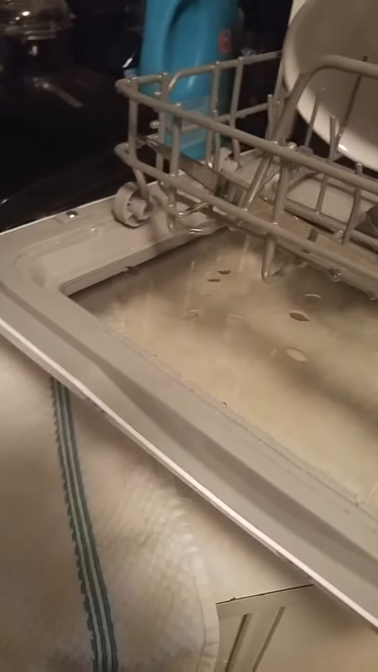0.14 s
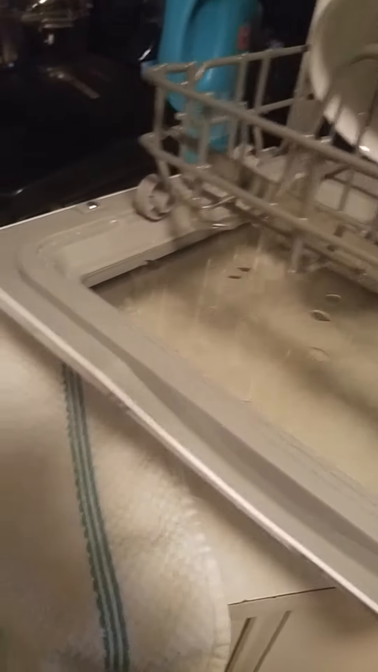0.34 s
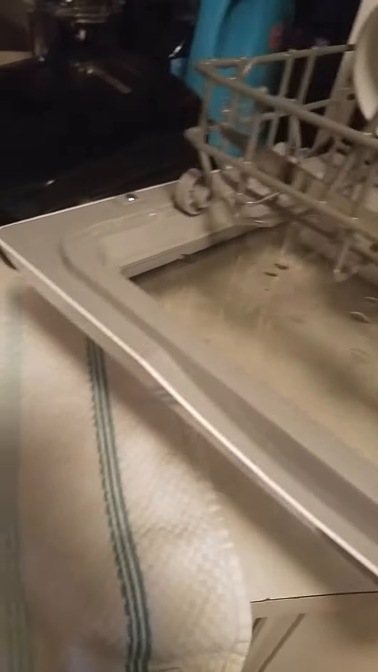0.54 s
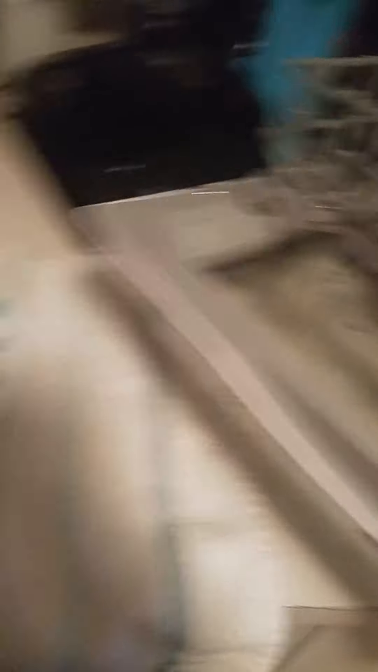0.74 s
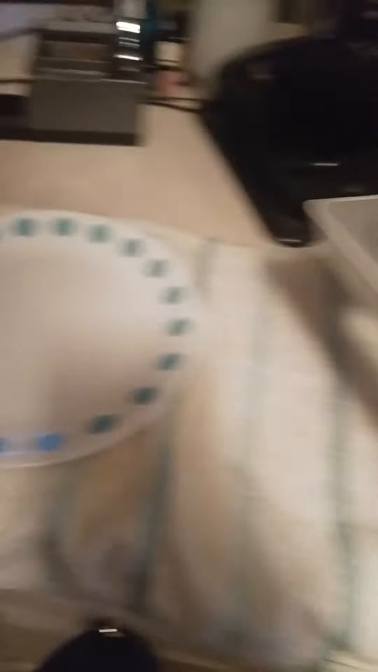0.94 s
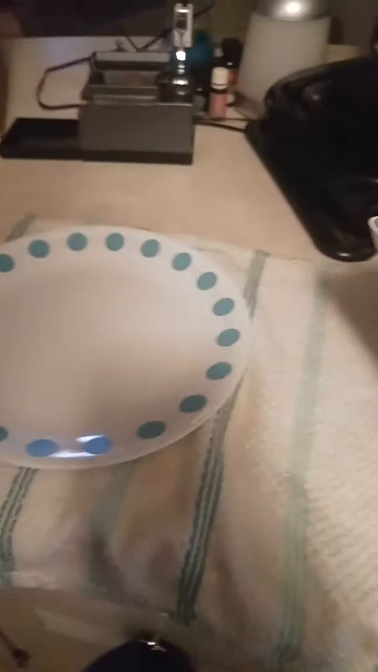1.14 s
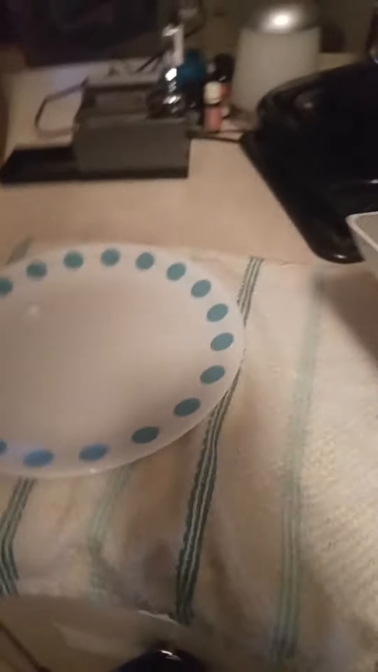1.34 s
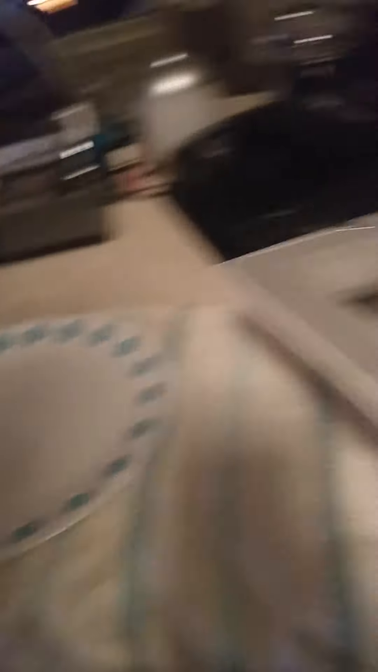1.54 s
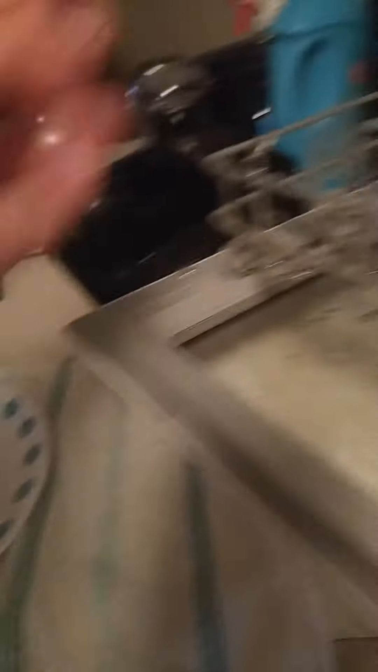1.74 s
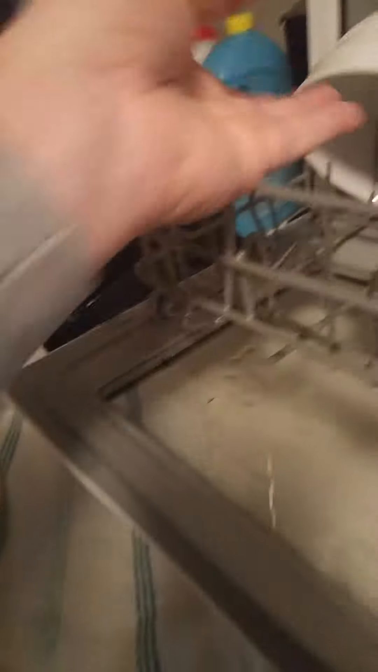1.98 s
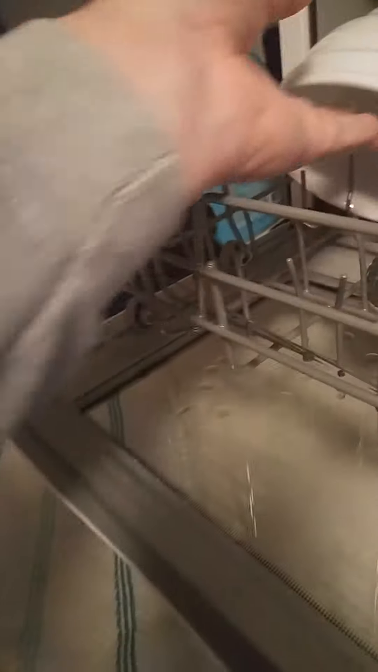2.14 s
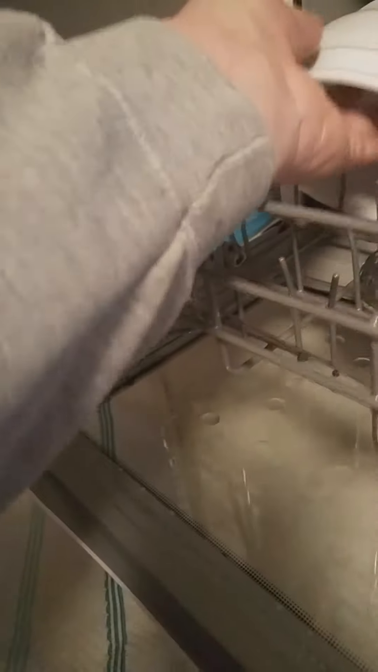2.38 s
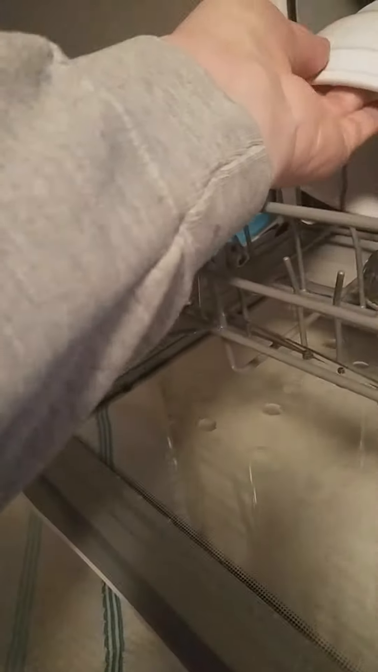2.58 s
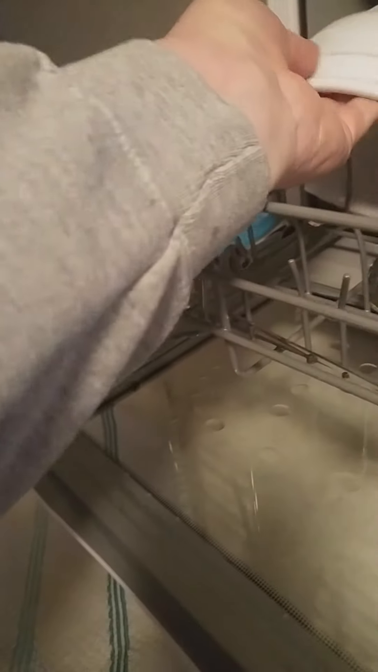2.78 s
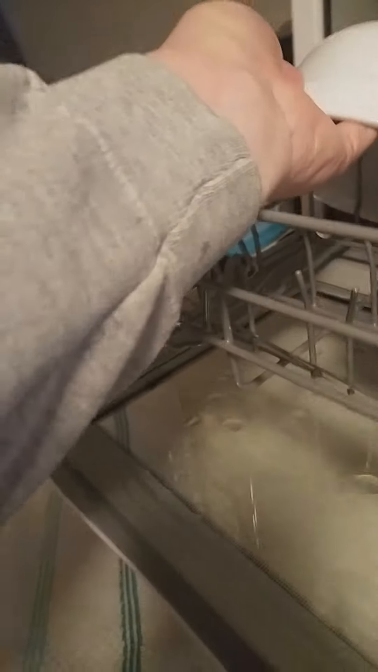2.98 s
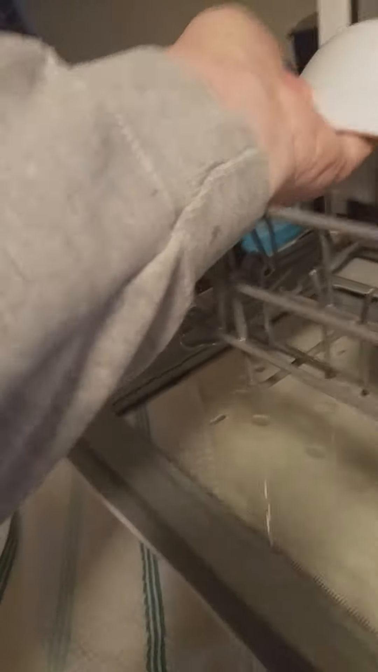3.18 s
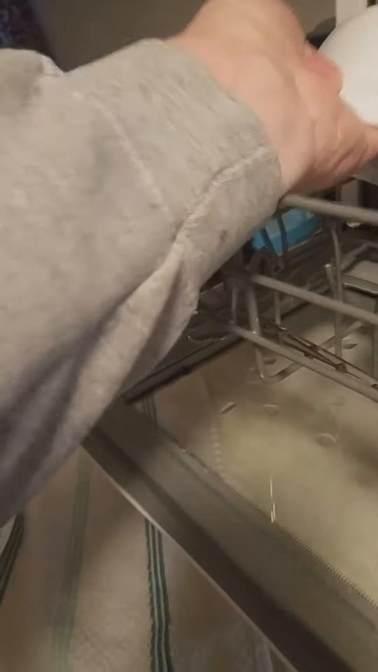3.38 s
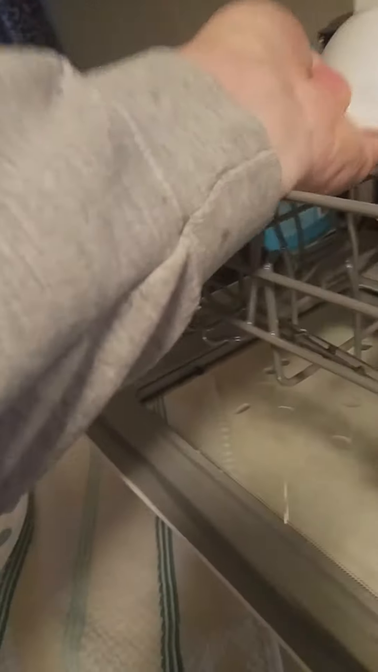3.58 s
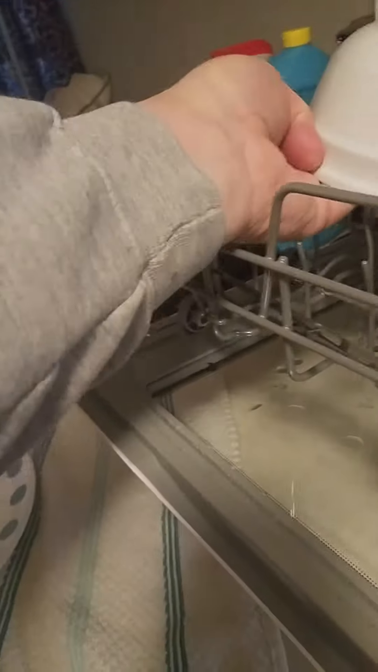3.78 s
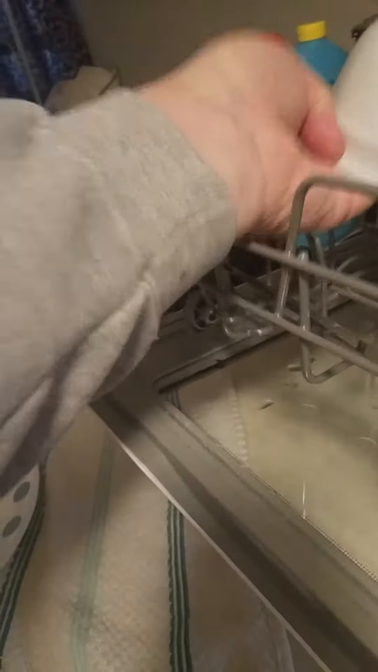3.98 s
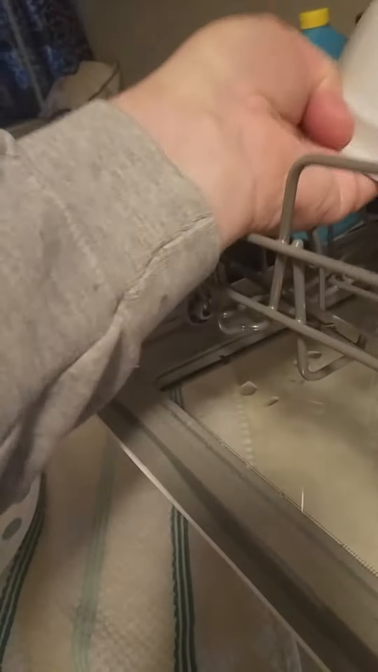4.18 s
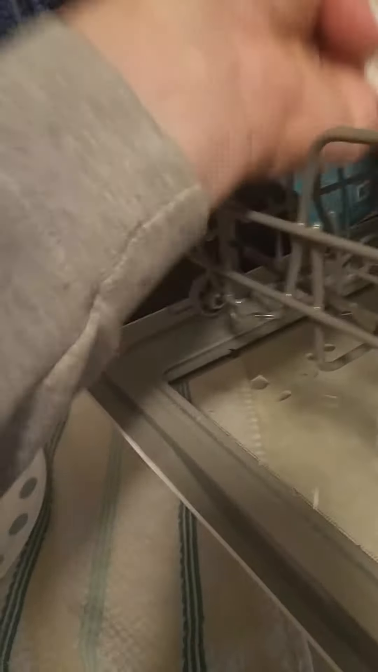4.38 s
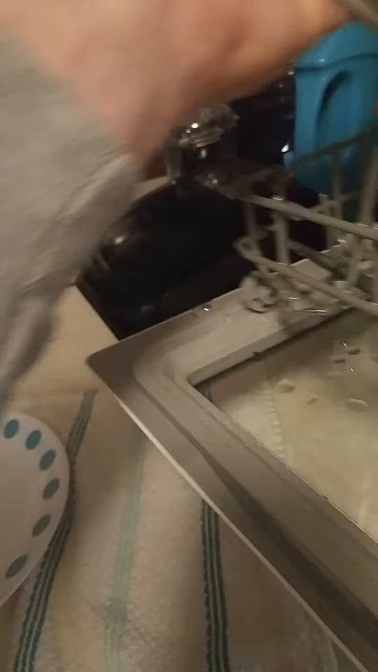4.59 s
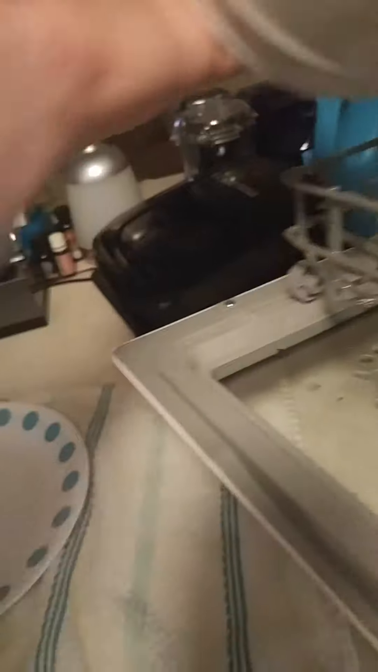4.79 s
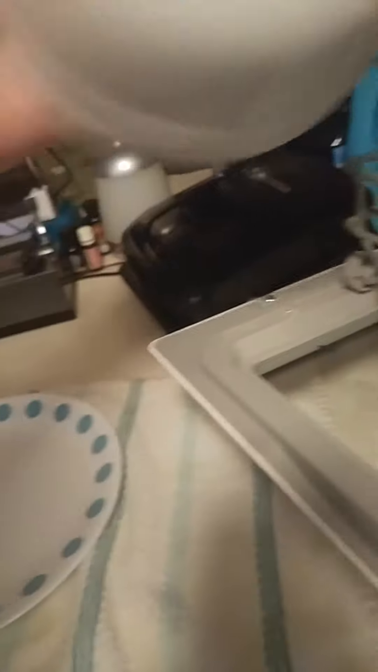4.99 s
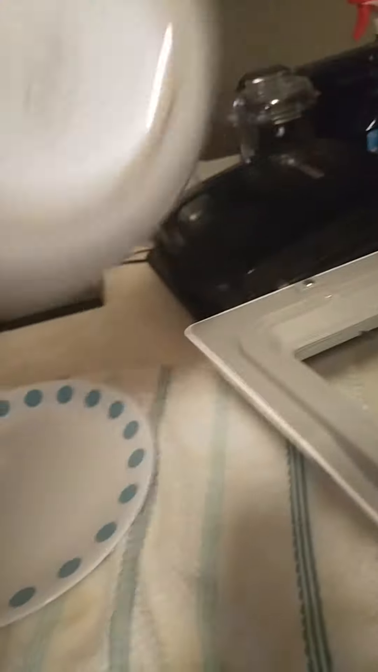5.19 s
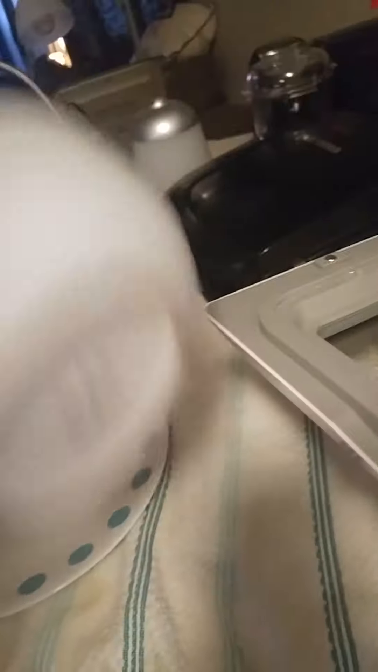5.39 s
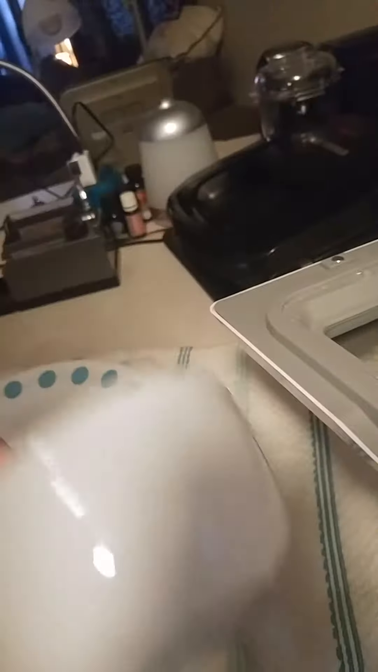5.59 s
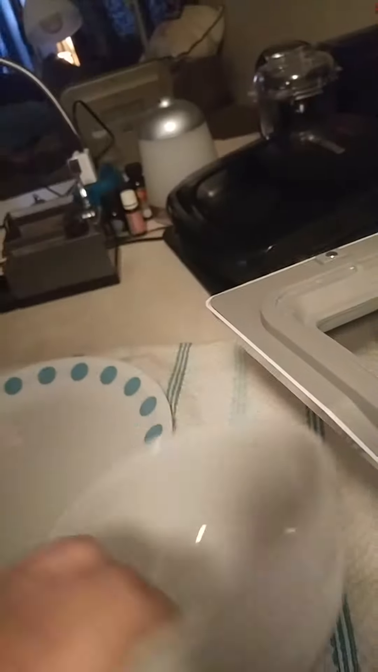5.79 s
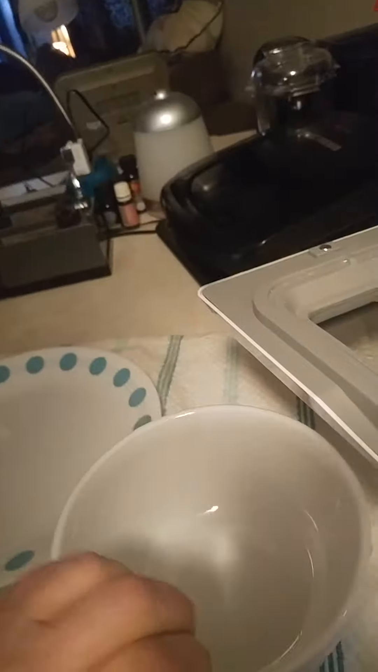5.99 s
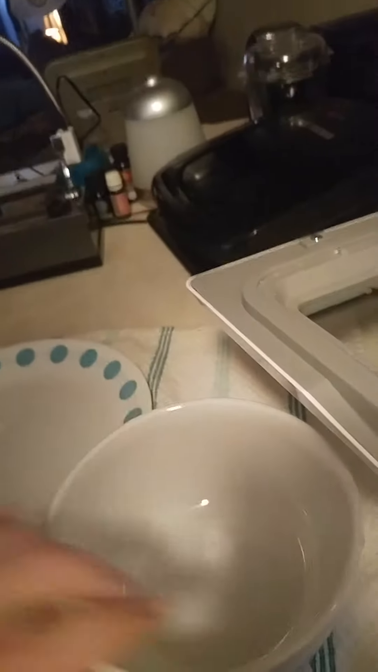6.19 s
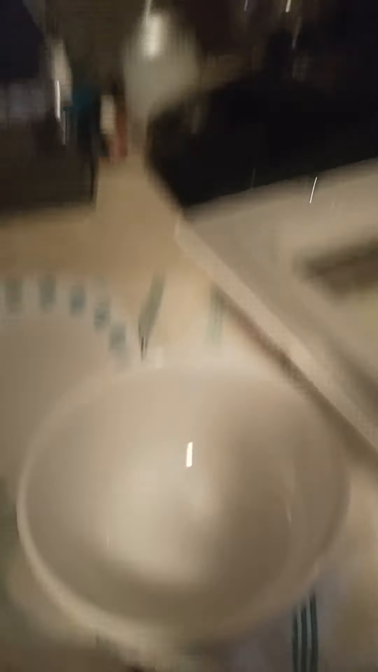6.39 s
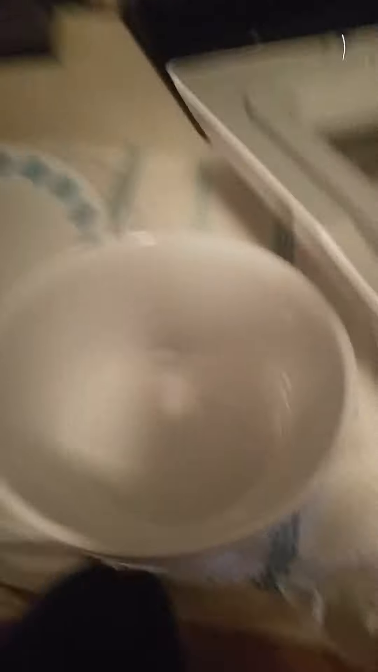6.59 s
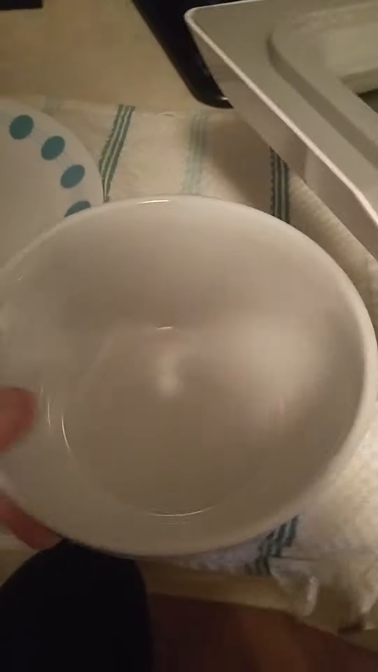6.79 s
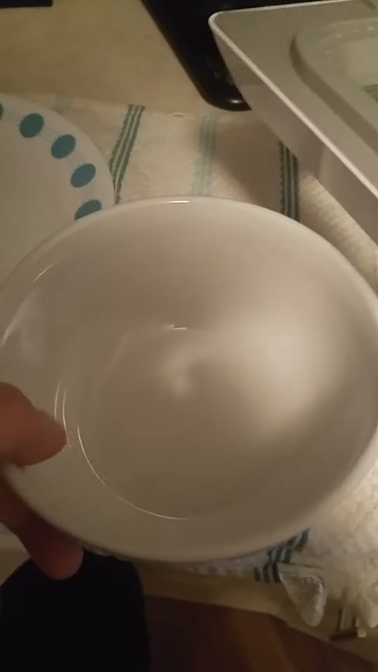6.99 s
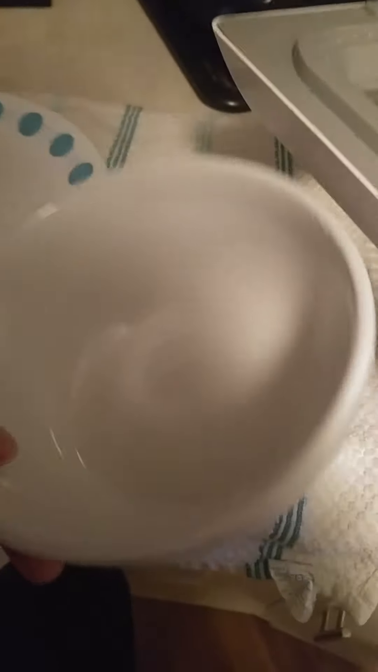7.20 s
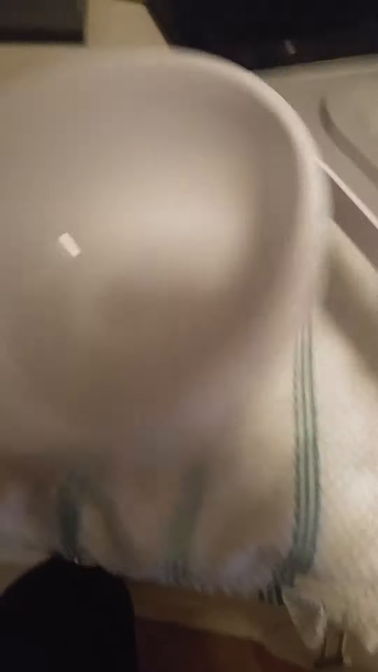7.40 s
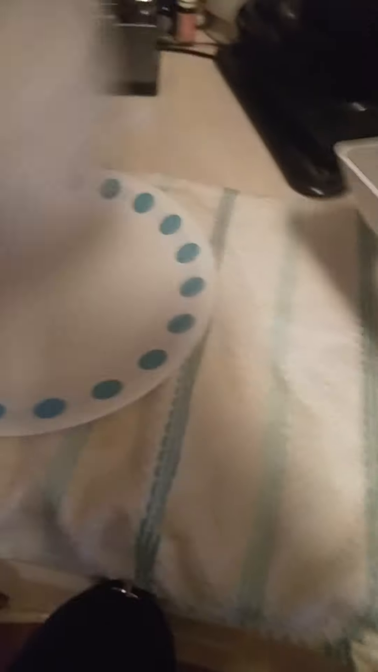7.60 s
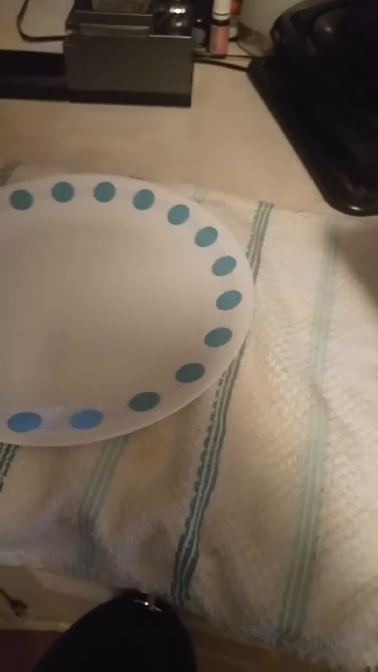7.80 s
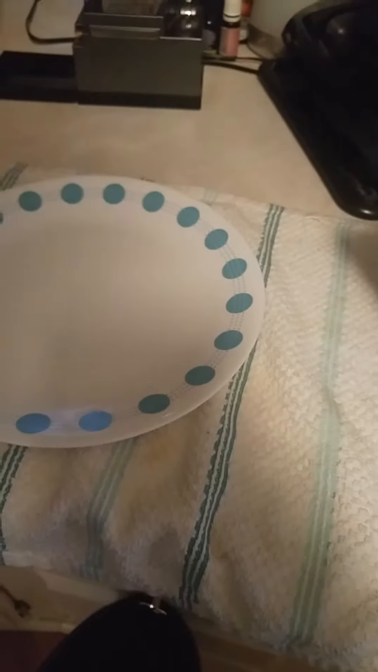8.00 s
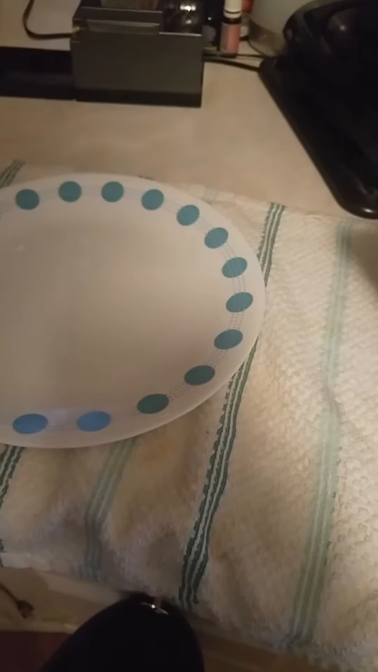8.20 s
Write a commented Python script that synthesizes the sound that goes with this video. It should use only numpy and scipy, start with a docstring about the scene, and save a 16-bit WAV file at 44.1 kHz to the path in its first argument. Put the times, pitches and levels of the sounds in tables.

```python
"""A humming kitchen, heard close to the dish rack on a hand-held phone with two microphone ports.
A china bowl is worked out of the wire rack: it knocks, chatters and scrapes on the tines, setting
basket, wires and china ringing, drags free, and is set on a plate that rings on.
Before that come short bright swishes; around it are dull thuds, rustling cloth, a slide on a towel
and the rumble of the hand that holds the microphone."""
import sys
import numpy as np
from scipy import signal
from scipy.fft import rfft, irfft, next_fast_len
from scipy.io import wavfile
from scipy.ndimage import map_coordinates

SR = 44100
rng = np.random.default_rng(int(sys.argv[2]) if len(sys.argv) > 2 else 0)


def unload_wav(signal):
    """Save mono or channel-first audio to the path in sys.argv[1] as 16-bit WAV at rate SR, clipped to [-1, 1]."""
    wavfile.write(
        sys.argv[1],
        SR,
        np.round(np.clip(np.atleast_2d(signal).T, -1, 1) * 32767).astype(np.int16),
    )


N = 363384


def amp(db):
    return 10 ** (np.asarray(db) / 20)


def unit(x):
    return x / np.sqrt(np.mean(x ** 2) + 1e-20)


def sides(pan_db):
    """Left and right gains, pan_db apart."""
    return amp([[pan_db / 2], [-pan_db / 2]])


def add(out, s, x):
    """Mixes x into out from second s on."""
    part = out[..., round(s * SR):][..., :x.shape[-1]]
    part += x[..., :part.shape[-1]]


def along(points, hz):
    """Reads (frequency [Hz], value) points on a log axis."""
    f, values = np.transpose(points)
    return np.interp(np.log(hz + 1), np.log(f + 1), values)


def curves(rows):
    """One level per sample for each column after the time; silent outside the rows."""
    s, *columns = np.transpose(rows)
    return [np.interp(np.arange(N) / SR, s, db, -120, -120) for db in columns]


def wobble(rate):
    """A smooth random curve, rate knots a second."""
    return map_coordinates(rng.standard_normal(int(N * rate / SR) + 4), [np.arange(N) * rate / SR])


def swells(events):
    """Envelope of (time [s], level [dB], rise [s], hold [s], fall [s]); rise and fall span 30 dB."""
    t, shapes = np.arange(N) / SR, []
    for s, db, rise, held, fall in events:
        corners = np.cumsum([s - rise, rise, held, fall])
        shapes.append(np.interp(t, corners, [db - 30, db, db, db - 30], -120, -120))
    return amp(np.max(shapes, 0))


def bursts(times, db, t60, rise, pan_db):
    """Stereo envelope of dying bursts; each setting is one value for all or one per burst."""
    out, t = np.zeros((2, N)), np.arange(SR // 2) / SR
    for s, level, decay, attack, pan in np.broadcast(times, db, t60, rise, pan_db):
        add(out, s, sides(pan) * amp(level - 60 * t / decay) * (1 - np.exp(-t / attack)))
    return out


def filtered(x, response):
    """x times a complex response of frequency."""
    size = next_fast_len(N + SR // 2)
    return irfft(rfft(x, size) * response(np.fft.rfftfreq(size, 1 / SR)), size)[..., :N]


def resonances(bands, f):
    """Response at f of (centre [Hz], width [Hz], level [dB]) resonances of alternating sign."""
    return sum((-1) ** k * amp(db) * 1j * f * width / (hz * hz - f * f + 1j * f * width)
               for k, (hz, width, db) in enumerate(bands))


# How alike noise is at the two microphone ports: (frequency [Hz], correlation [0-1])
PORT_LIKENESS = [(60, 0.8), (300, .92), (640, 0.061), (15000, 0.14)]
def rush(spectrum):
    """Stereo noise of rms 1, alike at both ports in the bass only."""
    def response(hz):
        spread = np.arccos(np.clip(along(PORT_LIKENESS, hz), -1, 1)) / 2
        return amp(along(spectrum, hz)) * [np.cos(spread), np.sin(spread)]
    mid, side = filtered(rng.standard_normal((2, N)), response)
    return unit(np.array([mid + side, mid - side]))


LEAD_S = 0.0003065  # the left port hears the dishes first
def ring(modes, scatter_db, rise_s, length=SR // 3, detune=.003):
    """One blow: each mode at a new strength, slightly detuned; treble reaches the ports out of step."""
    hz, db, t60 = np.transpose(modes)[:, :, None]
    t = np.arange(length) / SR
    skew, strength, mistune = rng.standard_normal((len(modes), 3)).T[:, :, None]
    port_phase = np.pi * hz * LEAD_S + np.clip(hz / 3000, 0, 1) * skew
    decay = amp(db + scatter_db * strength - 60 * t / t60)
    swing = decay * np.exp(2j * np.pi * hz * (1 + detune * mistune) * t)
    pair = [np.imag(np.exp(1j * side * port_phase[:, 0]) @ swing) for side in (1, -1)]
    return np.array(pair) * (1 - np.exp(-t / rise_s)) / np.linalg.norm(amp(db))


def rubbed(modes, drive):
    """Uneven stick and slip drives the modes; a soft contact feeds little above the top one."""
    grit = amp(7.5 * wobble(150)) * (rng.standard_normal(N) + 0.92 * rng.standard_normal((2, N)))
    top_hz = 1.2 * max(modes)[0]
    bands = [(hz, np.log(1000) / np.pi / t60, db + 10 * np.log10(t60)) for hz, db, t60 in modes]
    def response(f):
        port_delay = np.exp(1j * np.pi * LEAD_S * np.outer([1, -1], f))
        return resonances(bands, f) / (1 + 1j * f / top_hz) ** 2 * port_delay
    steady, driven = filtered(np.array([grit, grit * drive]), response)
    return driven / steady.std()


# Mains hum in the room: (frequency [Hz], relative level [dB])
HUM = [(60, -68), (120, -72), (240, -68.5), (360, -68), (720, -76.5)]
# Swells of a faint low tone: (time [s], relative level [dB], pitch [Hz])
LOW_TONE = [(1.346, -51, 260.5), (1.554, -62.5, 256.4), (1.7, -63, 263), (1.88, -57, 258.2),
            (2.0, -52.5, 260.7), (2.07, -54, 207)]
# Course of a late drone: (time [s], level [dB])
DRONE = [(6.65, -73.5), (6.8, -63.5), (7.05, -61), (7.25, -61), (7.7, -61), (7.9, -60.5), (8.03, -54),
         (8.1, -61.5), (8.24, -48.5)]
# Its bands: (centre [Hz], width of each of two filter passes [Hz], relative level [dB])
DRONE_BANDS = [(917, 35, 0), (958, 35, -2), (1140, 40, -7), (1550, 80, -6), (2050, 70, -15),
               (1400, 1500, -8)]
def kitchen_tones():
    """Mains hum, a faint low tone, and a drone of fuzzy bands that flicker one by one."""
    def band(hz, width):
        noise = rng.standard_normal((2, N))
        return unit(filtered(noise, lambda f: resonances([(hz, width, 0)], f) ** 2))
    t = np.arange(N) / SR
    hum = sum(amp(db - 4 + 2.5 * wobble(7.1)) * np.sin(2 * np.pi * hz * t + 0.48 * wobble(2.4))
              for hz, db in HUM)
    tone = sum(swells([(s, db + 3, .27, .02, .11)]) * np.sin(2 * np.pi * hz * t)
               for s, db, hz in LOW_TONE)
    drone = sum(amp(db + 1.3 * wobble(3)) * band(hz, width) for hz, width, db in DRONE_BANDS)
    return hum + tone + amp(curves(DRONE)[0]) * drone


# Steady noise at the microphone: (time [s], rumble level [dB], room level [dB])
HANDLING = [(0.0, -74, -64.5), (0.53, -72.5, -68), (1.17, -67.5, -58), (1.67, -76.5, -65), (2.09, -62, -57),
            (2.5, -79, -70), (2.78, -62, -68), (2.98, -54, -55.5), (3.79, -50, -46.5), (4.11, -45, -52),
            (4.41, -59, -36.5), (4.63, -64.5, -65.5), (5.69, -66.5, -56), (6.03, -66, -59.5),
            (7.02, -73.5, -64), (7.57, -68.5, -53.5), (7.8, -79, -59), (8.24, -72, -60)]
# Lurches of rack and hand: (time [s], rumble level [dB], room level [dB])
LURCHES = [(.23, -76, -68), (.44, -72, -68), (.69, -73, -67), (.97, -58, -73), (1.35, -73, -63.5),
           (1.9, -73, -64), (2.182, -51, -50.5), (2.32, -56, -59), (2.52, -49.5, -57), (2.68, -64, -55.5),
           (2.96, -36.5, -38), (3.08, -66, -55), (3.3, -43, -31.5), (3.492, -40.5, -36.5), (3.58, -42, -49),
           (3.818, -33, -24.5), (4.01, -63, -82), (4.2, -41, -70), (4.379, -36.5, -35),
           (4.559, -42.5, -40.5), (4.859, -56.5, -57), (5.249, -45.5, -47.5), (5.62, -69, -71),
           (5.97, -39.5, -53), (6.56, -67, -62), (7.2, -71, -64), (7.41, -62, -55), (7.499, -64, -38),
           (7.78, -75, -58.5), (8.17, -53, -51)]
# Rumble of the hand on the phone: (frequency [Hz], relative density [dB])
RUMBLE = [(12, -48.5), (20, -16), (65, 4), (86, 5), (130, -11), (200, 2), (260, -17.5), (440, -120)]
# Room noise around it: (frequency [Hz], relative density [dB])
ROOM = [(59, -27), (100, -7), (199, -13.5), (263, 0.5), (304, -10), (353, 3), (409, -2.5), (481, -9.5),
        (549, -19), (576, -2), (668, -5.5), (786, -5.5), (911, -10.5), (2070, -27), (5000, -33),
        (6500, -53.5), (11000, -120)]
def handling_and_room():
    """Lumpy handling rumble and room noise; every lurch lifts both."""
    rumble_db, room_db = curves(HANDLING)
    lurch_s = (.066, .015, .096)  # rise, hold, fall
    rumble_lift = swells([(s, db, *lurch_s) for s, db, _ in LURCHES])
    room_lift = swells([(s, db, *lurch_s) for s, _, db in LURCHES])
    rumble_level = amp(rumble_db + 2.5 * wobble(12)) + rumble_lift
    rumble = rumble_level * unit(amp(1.3 * wobble(13)) * rush(RUMBLE))
    return rumble + (amp(room_db) + room_lift) * amp(1.6 * wobble(6)) * rush(ROOM)


# Two stretches of rustling, each a list of (time [s], level [dB])
RUSTLES = [
    [(0.0, -64), (0.23, -78), (0.34, -66), (0.54, -71), (0.98, -64.5), (1.55, -69), (1.97, -57.5),
     (2.54, -71.5), (2.78, -74)],
    [(4.56, -69.5), (4.62, -74), (4.89, -71.5), (5.33, -62.5), (5.87, -63.5), (6.07, -68), (7.23, -70),
     (7.44, -68), (8.15, -72.5)],
]
# Single strokes of cloth: (time [s], level [dB], hold [s])
STROKES = [(6.4, -50, 0.0045), (6.478, -45, 0.064)]
# Cloth friction: (frequency [Hz], relative density [dB])
CLOTH = [(880, -44), (1500, -19), (1980, -6.5), (2350, -15), (2540, -14), (4620, -13.5), (8480, -4),
         (12100, -11), (14800, -14.5), (16200, -26.5)]
def cloth():
    """Cloth rubs with a soft, fluttering hiss and two brief strokes."""
    strokes = swells([(s, db, .0296, held, .037) for s, db, held in STROKES])
    level = sum(amp(curves(rows)[0]) for rows in RUSTLES) + strokes
    return level * amp(0.62 * wobble(28)) * rush(CLOTH)


# Drags on the towel: (time [s], level [dB], hold [s], rise [s], fall [s], highest resonance [Hz])
SLIDES = [(.64, -60.5, .74, 0.017, .08, 1246), (6.5, -51.5, .2, 0.4, 0.132, 1190)]
# Hollow noise, also under swishes and thuds: (frequency [Hz], relative density [dB])
HOLLOW = [(500, -41), (650, -5), (850, 0.5), (1000, -8), (1800, -17.5), (2500, -34.5)]
def towel_slide():
    """Something drags over cloth: noise through a resonance that arches up and down."""
    out, t = np.zeros((2, N)), np.arange(N) / SR
    arch_hz, half_width_hz = 110, 90
    for s, db, held, rise, fall, top_hz in SLIDES:
        hz = top_hz - arch_hz * np.clip(2 * (t - s) / held - 1, -1, 1) ** 2
        flutter = filtered(rng.standard_normal((2, 2, N)), lambda f: 1 / (1 + (f / half_width_hz) ** 2))
        phase = 2 * np.pi * np.cumsum(hz) / SR
        resonance = unit(flutter[0] * np.cos(phase) + flutter[1] * np.sin(phase))
        level = swells([(s, db, rise, held, fall)]) * amp(2.5 * wobble(19))
        out += level * (resonance + 0.7 * rush(HOLLOW))
    return out


# Bright swishes, levels relative: (time [s], level [dB], t60 [s], hollow level [dB],
# left-right [dB], hollow pitch [Hz], hiss level [dB])
SWISHES = [(0.2262, -22, 0.25, -42, -1.5, 650, -42), (0.4332, -36.5, 0.21, -61, -2, 800, -42),
           (0.6707, -29.5, 0.31, -60, -1.5, 800, -36.5), (0.7114, -43, 0.12, -73, -4, 800, -46),
           (0.7254, -47, 0.088, -71, -1.5, 800, -50), (0.7766, -37.5, 0.4, -74, -2, 800, -45.5),
           (1.056, -23, 0.23, -36, -1.5, 853, -47.5), (1.2087, -29, 0.26, -46, 1, 840, -47)]
# Soft lead-ins to three of them: (time [s], level [dB])
LEAD_INS = [(.215, -44), (.41, -49), (1.015, -48.5)]
# Body of a swish: (frequency [Hz], relative density [dB])
SWISH = [(880, -56), (1500, -38.5), (2080, -15), (2300, -18), (4240, -4.5), (7390, 5), (12000, -14.5),
         (13400, -22), (16000, -62)]
# Hiss on top of it: (frequency [Hz], relative density [dB])
TOP_HISS = [(7000, -40), (10000, 2), (12500, 0), (14500, -13), (16200, -29.5)]
def swishes():
    """Grainy bright bursts with a sharp front edge and a weak hollow note under them."""
    times, db, t60, hollow_db, pan, hollow_hz, hiss_db = np.transpose(SWISHES)
    rise_s = .0014
    grain = amp(0.59 * wobble(300))
    tails = bursts(times, db - 8, t60, rise_s, pan)
    edges = bursts(times + .001, db - 7, .012, .0002, pan)
    lead_ins = swells([(s, level, .057, 0, .12) for s, level in LEAD_INS])
    out = (tails + edges + lead_ins) * unit(grain * rush(SWISH))
    out += bursts(times, hiss_db - 8, t60, rise_s, pan) * rush(TOP_HISS)
    for s, level, hz in zip(times, hollow_db, hollow_hz):
        add(out, s, amp(level + 1.5) * ring([(hz, 0, .2)], scatter_db=.9, rise_s=.012))
    return out + bursts(times, hollow_db - 3, t60, .008, pan) * rush(HOLLOW)


# Dull knocks around the rack, levels relative: (time [s], level [dB], pitch [Hz], ring t60 [s],
# wood level [dB], snap level [dB], puff t60 [s], left-right of the noise [dB])
THUDS = [(0.64, -56, 640, .04, -59, -70, .04, -2), (0.946, -35.5, 71.5, 0.13, -62, -67, 0.091, -1),
         (5.642, -56, 253, 0.1, -64, -41.5, 0.073, -4), (5.952, -11, 108.9, 0.096, -55, -61, 0.16, -4),
         (6.117, -53, 49, 0.11, -63, -73, 0.11, -3), (6.848, -47, 756, 0.1, -54, -43.5, 0.18, -0.5),
         (7.395, -6.5, 201, 0.18, -16.5, -23.5, 0.17, 0.5), (7.536, -30, 573, 0.092, -34, -49.5, 0.18, -1)]
# Hollow cabinet under a knock: (frequency [Hz], relative density [dB])
CABINET = [(90, -40.5), (150, -3.5), (200, 1), (280, -2), (400, -3), (600, -36)]
# Wooden puff, also under plate and rack: (frequency [Hz], relative density [dB])
WOOD = [(180, -37), (300, -21), (424, -6), (490, -16.5), (572, -6.5), (841, -3.5), (981, -10), (1560, -13),
        (3000, -26), (3900, -61.5), (6600, -120)]
# Thin snap of a knock: (frequency [Hz], relative density [dB])
SNAP = [(1470, -15), (2500, -16.5), (6600, -8.5), (7590, -3.5), (13100, -24.5), (14500, -30), (16000, -50)]
def thuds():
    """A low push with a short ring, a lingering hollow body, a wooden puff and a thin snap."""
    out = np.zeros((2, N))
    for s, db, hz, t60, *_, pan in THUDS:
        modes = [(hz, 0, t60), (1.75 * hz, -7, 0.6 * t60)]
        add(out, s, amp(db) * ring(modes, scatter_db=.69, rise_s=.0036) * sides(pan / 2))
    times, *_, wood_db, snap_db, puff_t60, pan = np.transpose(THUDS)
    out += bursts(times, wood_db - 1.5, .3, .004, 0) * rush(CABINET)
    out += bursts(times, wood_db - 3, .09, .003, pan) * rush(HOLLOW)
    out += bursts(times, wood_db + 1.6, puff_t60, .0012, pan) * rush(WOOD)
    return out + bursts(times, snap_db + 2.6, 0.64 * puff_t60, .0004, pan) * rush(SNAP)


# Bowl on plate, levels relative: (time [s], ring level [dB], crack level [dB], left-right [dB])
LANDING = [(8.157, -2.5, -21, -4), (8.183, -13.5, -20, -5), (8.196, -5.5, -33, 3), (8.204, -16, -48, -12)]
# Modes of the plate: (frequency [Hz], relative level [dB], t60 [s])
PLATE = [(652, -1, 0.072), (940, -4.5, 0.25), (1700, 3, 0.021), (3135, -12.5, 0.021), (2330, 0, 0.11),
         (3920, -13.5, 0.31), (4053, -14.5, 0.24), (4180, -2, 0.16), (4376, -5, .08), (4508, -10, .08),
         (4288, -0.5, 0.18), (6568, -10, 0.69), (7020, -14, .3), (9400, -11.5, .5), (10200, -11.5, 0.17),
         (9900, -28.5, .3), (11610, -15, 0.148), (11810, -13, 0.14), (12340, -40, .3), (12770, -20, 0.288),
         (13200, -14, .24), (14050, -15.5, .12)]
# Crack of struck china, also in the rack: (frequency [Hz], relative density [dB])
CRACK = [(1500, -28), (2500, 6), (3500, -1.5), (6000, -3.5), (9000, -9), (13500, -16), (14500, -22),
         (16300, -39.5)]
def plate():
    """The bowl touches down and rocks; the plate rings on."""
    out = np.zeros((2, N))
    for s, db, _, pan in LANDING:
        blow = ring(PLATE, scatter_db=1.56, rise_s=.00063, detune=.00048)
        add(out, s, amp(db - 4) * blow * sides(pan))
    times, _, crack_db, pan = np.transpose(LANDING)
    return out + bursts(times, crack_db + 2, .04, .0008, pan) * (rush(WOOD) + 0.58 * rush(CRACK))


# How the dish rings as the contact point moves:
# (time [s], clink over chime [dB], treble over china [dB])
DISH_COLOUR = [(2.5, -3, 10.5), (2.8, -8.5, -9), (2.86, 0, -4), (2.97, -10, -10), (3.0, -4, 4),
               (3.17, -2, 9.5), (3.25, 4.5, -5), (3.34, -3.5, -8), (3.54, 1.5, 4), (3.61, -2, 11.5),
               (3.64, -5, -10), (3.8, 3.5, -8), (4.1, 2.5, 5.5), (4.2, 9, -8), (4.4, 7, -0.5),
               (4.5, 0.5, -13), (4.8, -10, -1), (5.19, 12, -16)]
FREE_S = 4.4  # the bowl rings out once clear of the tines
def china_levels(times, china_db):
    """Levels of the dish's clink, chime and treble modes and of the bowl at each contact."""
    at, *colour = np.transpose(DISH_COLOUR)
    tilt_db, bright_db = (np.interp(times, at, db) for db in colour)
    bowl_db = china_db + np.where(times > FREE_S, 6, -10.5)
    return china_db + tilt_db / 2, china_db - tilt_db / 2, china_db + bright_db, bowl_db


# China against rack, close to the microphone, levels relative: (time [s], tine [dB], basket [dB],
# wire [dB], china [dB], crack [dB], chatter t60 [s], left-right [dB])
CONTACTS = [(2.174, -30, -30.5, -41, -68, -72, .057, 0), (2.195, -34.5, -35, -65, -76, -77, .058, 5),
            (2.296, -41, -33.5, -52, -71, -82, .06, 1), (2.529, -39.5, -44, -62, -68, -77, .05, 2),
            (2.663, -39, -44.5, -66.5, -61.5, -83, .066, -6),
            (2.79, -34.5, -39.5, -44, -37.5, -61, .038, -1.5),
            (2.807, -16.5, -21, -28.5, -30, -55.5, .13, -0.5),
            (2.832, -17, -21, -19.5, -25.5, -44.5, .062, 5), (2.853, -8.5, -35, -12.5, -33, -52.5, .022, 2),
            (2.871, -6, -47, -22, -40, -49, .069, -6), (2.881, -15.5, -39.5, -25, -38, -51, .11, -6.5),
            (2.903, -1.5, -19.5, -22, -29, -45.5, .08, 2.5),
            (2.978, -4, -46, -17.5, -28.5, -46.5, .057, -6),
            (2.994, -22.5, -21.5, -22.5, -21.5, -45, .046, 0), (3.155, -37, -41, -64, -52, -74, .039, 1),
            (3.196, -39, -33, -31.5, -43, -38.5, .055, 2), (3.214, -18, -23.5, -22.5, -42, -41, .048, 1.5),
            (3.243, -42, -37, -56, -48.5, -55, .046, -0.5), (3.26, -23, -49, -51, -53, -57.5, .032, 7),
            (3.275, -10, -38, -40.5, -39, -49, .028, -1.5),
            (3.301, -16, -28.5, -32.5, -34, -46.5, .088, 1.5),
            (3.319, -25, -29.5, -31.5, -33.5, -59.5, .034, -2),
            (3.334, -26, -27.5, -45, -41.5, -59.5, .053, -9), (3.45, -37.5, -43.5, -54, -53, -68.5, .05, 0),
            (3.468, -29, -32, -38, -41.5, -47, .11, 3), (3.52, -35, -38.5, -45.5, -47, -61.5, .12, -1.5),
            (3.554, -28, -28.5, -41.5, -43, -59.5, .056, 0), (3.609, -24, -44, -40.5, -35, -54.5, .057, -1),
            (3.639, -37.5, -44.5, -35, -33.5, -53.5, .035, 1.5),
            (3.693, -40, -45, -50.5, -54.5, -66, .025, 1.5),
            (3.747, -15, -33.5, -30.5, -37.5, -54, .05, 0.5),
            (3.754, -13, -29.5, -24, -34.5, -45.5, .077, 1.5),
            (3.76, -14.5, -29.5, -18.5, -31, -42, .027, -2.5),
            (3.79, -21, -18, -17.5, -34, -25.5, .026, 0.5), (3.8, -23, -10.5, -11, -7, -16, .041, 0),
            (3.818, -20, -19.5, -21.5, -16, -29, .028, -2), (3.831, -29, -17, -24, -23, -39, .02, -.5),
            (3.959, -38, -42, -42.5, -72, -53.5, .09, -2),
            (4.058, -35, -33.5, -39.5, -51.5, -45.5, .042, 0.5),
            (4.101, -33.5, -34, -46, -54, -60.5, .079, 0),
            (4.135, -33.5, -25.5, -46.5, -56, -64.5, .035, -3),
            (4.15, -31, -34.5, -35.5, -60, -48, .09, 1.5), (4.18, -42, -33, -44, -59, -55.5, .039, -6.5),
            (4.248, -41, -43, -34, -36.5, -47.5, .096, -0.5), (4.38, -28, -21, -15, -13.5, -16, .035, -2),
            (4.395, -42.5, -28.5, -32.5, -24.5, -32.5, .017, -2),
            (4.413, -22.5, 4, -9, -19, -19.5, .043, 2), (4.432, -31.5, -7.5, -20, -22, -23.5, .033, -6),
            (4.473, -23.5, -17, -32, -36.5, -32, .067, -2.5), (4.491, -40, -19, -25, -41, -39, .039, 0),
            (4.566, -49, -29.5, -55.5, -52.5, -57, .061, 2.5),
            (4.796, -34, -24.5, -47, -69.5, -64, .039, 2.5),
            (4.82, -37.5, -23.5, -35, -71, -46, .042, -3.5),
            (5.178, -36.5, -30.5, -46.5, -65, -66, .036, -1),
            (5.193, -27, -30, -30.5, -48, -44.5, .062, 1.5)]
# Pressure of the rim on the tines: (time [s], level [dB])
SCRAPE = [(2.76, -69.5), (2.836, -75.5), (2.924, -56.5), (2.962, -54.5), (3.184, -61), (3.298, -53.5),
          (3.428, -56.5), (3.542, -50), (3.748, -45.5), (3.93, -56.5), (4.106, -56.5), (4.272, -55.5),
          (4.422, -48), (4.458, -52), (4.572, -72.5), (4.62, -76)]
# Modes of the rack's parts: (frequency [Hz], relative level [dB], t60 [s])
BASKET = [(347.8, 4.5, 0.11), (192.9, -2.5, 0.13), (444, -2, 0.21)]  # main mode first
TINES = [(675, -15.5, 0.14), (688.7, 2.5, 0.033), (754, -2.5, 0.061), (830, -7, 0.062)]
WIRES = [(1303, -3, 0.047), (1608, -9, 0.063), (1699, -10, 0.13), (1819, -4.5, 0.04), (2190, -4.5, 0.037),
         (2450, -3.5, 0.026), (2568, -12, 0.07)]
# Modes of a dish standing in the rack: (frequency [Hz], relative level [dB], t60 [s])
DISH_CLINK = [(3988, 0.5, 0.053), (4230, -2.5, 0.18), (4228, 3.5, 0.071), (4554, -4, .1)]  # ring near 4 kHz
DISH_CHIME = [(2327, -8, 0.14), (2437, -5.5, 0.068), (5450, -26, .06), (6410, -1, 0.12), (6844, 3.5, 0.1),
              (6950, -4.5, 0.096)]  # ring near 2.4 and 6.5 kHz
DISH_TREBLE = [(8220, -12, 0.15), (9026, -3, 0.088), (9330, -11, .15), (9780, -9, 0.17),
               (9574, -4.5, 0.076), (10280, -8.5, .14), (11080, -7.5, .12), (10470, -13.5, .12),
               (11460, 0, 0.047), (12050, -9.5, .1), (12060, -4, 0.14), (13100, -11.5, .1),
               (13100, -12.5, .12), (13370, -12.5, .14), (13760, -14, .14), (13800, -21, .12)]
# Modes of the bowl in the hand: (frequency [Hz], relative level [dB], t60 [s])
BOWL = [(3436, -12.5, 0.13), (4100, 1, 0.14), (4630, -14, 0.083), (5320, -9.5, .14), (6330, -14, 0.14),
        (7230, 1.5, 0.081), (7800, -14, 0.17), (8880, -6, 0.16), (10700, -16.5, .07), (11500, -6, 0.099),
        (11884, -15.5, 0.11)]
def rack():
    """Each contact cracks, rings rack and china, and chatters on; between contacts the rim scrapes."""
    out = np.zeros((2, N))
    times, tine_db, basket_db, wire_db, china_db, crack_db, t60, pan = np.transpose(CONTACTS)
    clink_db, chime_db, treble_db, bowl_db = china_levels(times, china_db)
    rise = .00082 + .015 * t60  # contacts that chatter longer also start softer
    bright_parts = [(wire_db + 1, WIRES), (clink_db, DISH_CLINK), (chime_db + 3, DISH_CHIME),
                    (treble_db - 1.5, DISH_TREBLE), (bowl_db + 2.5, BOWL)]
    for k, s in enumerate(times):
        # relieved of the bowl, the basket swings a while mostly in its main mode
        duck_db = -12.5 if FREE_S < s < FREE_S + .13 else 0
        basket = BASKET[:1] + [(hz, db + duck_db, ring_s) for hz, db, ring_s in BASKET[1:]]
        add(out, s, amp(basket_db[k] - 4) * ring(basket, 1.5, 2.5 * rise[k], SR // 6))
        add(out, s, amp(tine_db[k] + 8.5) * ring(TINES, 2.6, 2.8 * rise[k], SR // 6) * sides(pan[k]))
        for db, modes in bright_parts:
            add(out, s, amp(db[k]) * ring(modes, 3, rise[k], SR // 5) * sides(pan[k]))

    def chatter(db):
        return bursts(times, db, t60, rise / 0.76, pan)
    press = amp(curves(SCRAPE)[0] + 3.2 * wobble(22))
    rattle = chatter(wire_db)
    out += 1.4 * rattle * rush(WOOD) + chatter(crack_db + 7.5) * rush(CRACK)
    out += rubbed(TINES + WIRES, press + .95 * rattle)
    out += rubbed(DISH_CLINK, 0.46 * press + chatter(clink_db))
    out += rubbed(DISH_CHIME, 0.97 * press + chatter(chime_db - 1))
    out += rubbed(DISH_TREBLE, 0.4 * press + chatter(treble_db + 4.5))
    return out + rubbed(BOWL, chatter(bowl_db + 1.5))


# Force of the bowl dragging free: (time [s], level [dB])
PULL = [(4.25, -59), (4.3, -40), (4.325, -32), (4.345, -32), (4.358, -24.5), (4.372, -40), (4.382, -59)]
def pull():
    """A rising scrape through tines, wires and the dish as the bowl comes loose."""
    force = amp(curves(PULL)[0])
    out = rubbed(WIRES, force) + .7 * rubbed(TINES, force) + 0.42 * rubbed(DISH_CLINK, force)
    out += force * (1.3 * rush(WOOD) + 0.82 * rush(CABINET))
    return out + 0.31 * rubbed(DISH_CHIME + DISH_TREBLE, force)


# Reverberation of the kitchen: (frequency [Hz], t60 [s])
KITCHEN_DECAY = [(200, 0.27), (2000, 0.38), (10000, 0.25)]
def walls(x):
    """The walls answer a moment later, thin in the bass; each frequency dies at its own speed."""
    hz, t, noise = signal.stft(rng.standard_normal((2, SR // 2)), SR, nperseg=256)
    decay = amp(-60 * t / along(KITCHEN_DECAY, hz)[:, None])
    tail = signal.istft(noise * decay, SR, nperseg=256)[1]
    delayed = np.pad(x, ((0, 0), (300, 0)))
    echo = signal.fftconvolve(delayed, tail / np.linalg.norm(tail[0]), axes=1)[:, :N]
    return filtered(echo, lambda f: f / (f + 400))


# Balance of the dishes and thuds between the microphone ports: (frequency [Hz], left-right [dB])
PORT_BALANCE = [(60, 4.5), (110, 2.5), (200, 0), (380, -4), (700, 1), (1290, 2), (2380, 3.5), (4400, 5),
                (8120, -2), (15000, -3)]
def scene():
    """The close dishes and thuds with their echo, among the softer sounds of the kitchen."""
    near = rack() + pull() + plate() + thuds()
    in_room = near + amp(-11.5) * walls(near)
    at_ports = filtered(in_room, lambda hz: amp(along(PORT_BALANCE, hz) / [[2], [-2]]))
    return at_ports + swishes() + towel_slide() + kitchen_tones() + cloth() + handling_and_room()


def record(dry):
    """The phone loses the deepest bass, rounds off the loudest blows and cuts the highest treble."""
    low_cut_hz, top_hz = 25, 16350
    thin = filtered(dry, lambda hz: (1j * hz / (1j * hz + low_cut_hz)) ** 2)
    limited = thin / (1 + np.abs(thin) ** 6) ** (1 / 6)
    return filtered(limited, lambda hz: hz < top_hz)


dry = scene()
out = record(dry)
unload_wav(out)
```